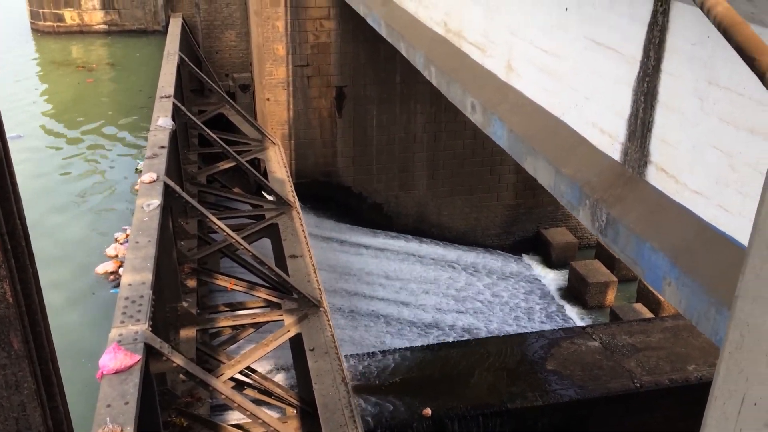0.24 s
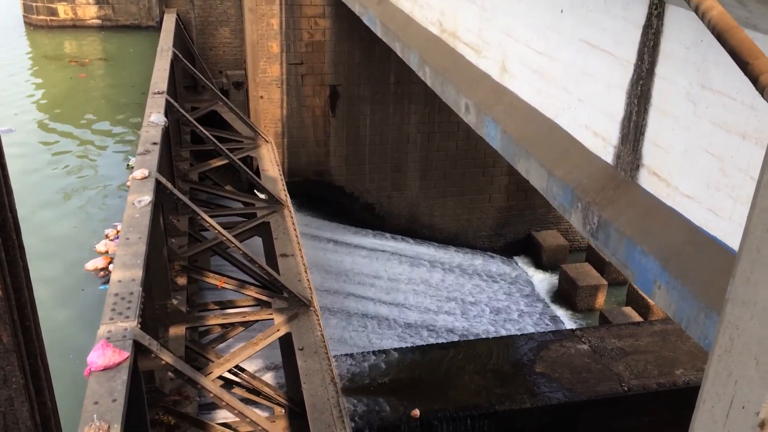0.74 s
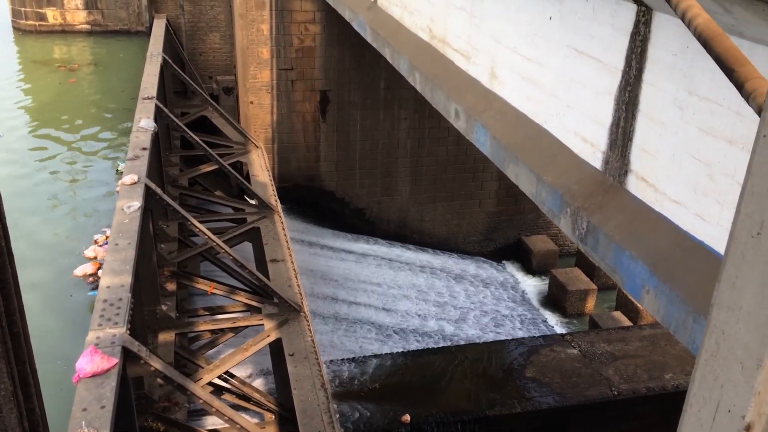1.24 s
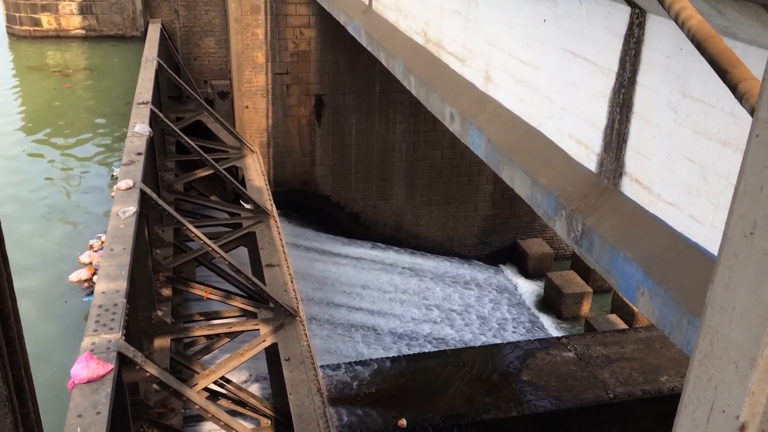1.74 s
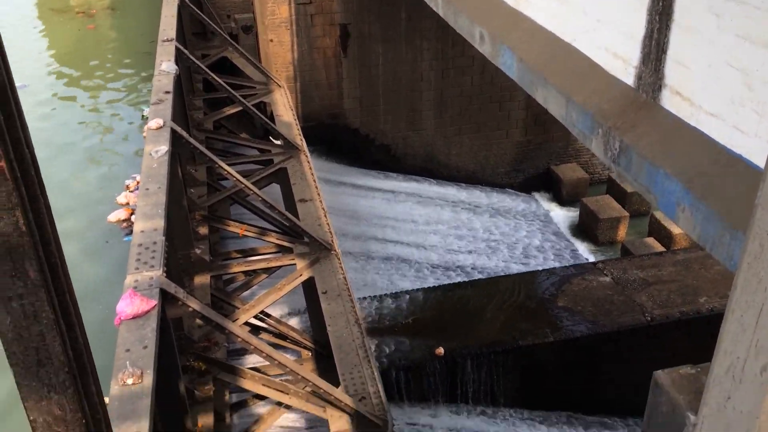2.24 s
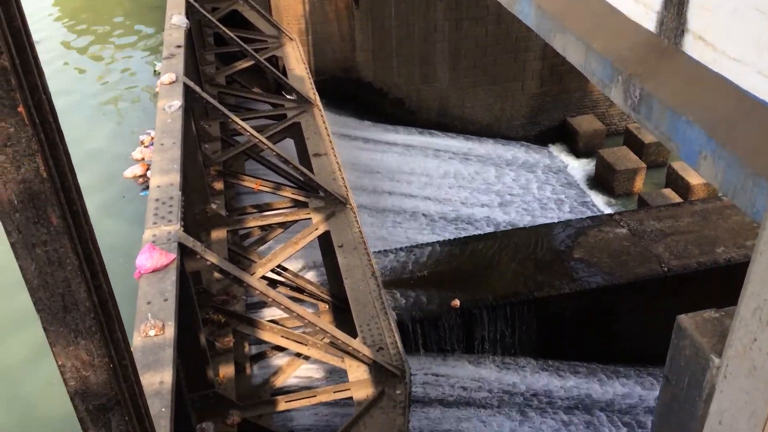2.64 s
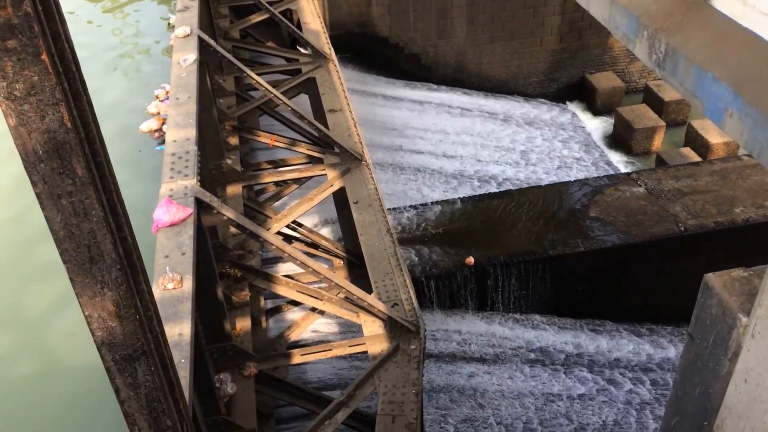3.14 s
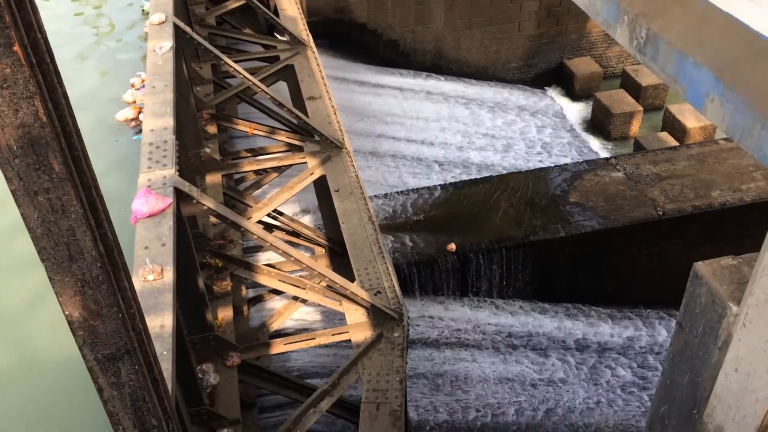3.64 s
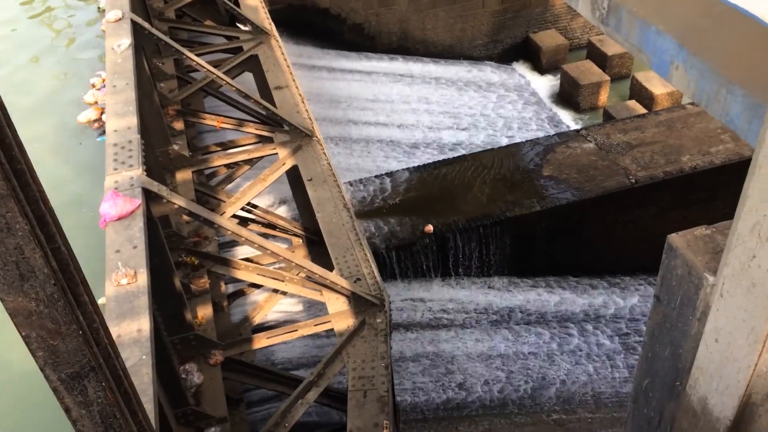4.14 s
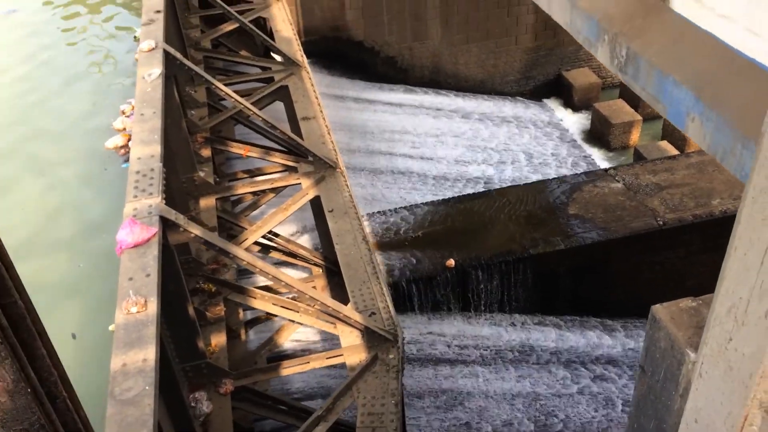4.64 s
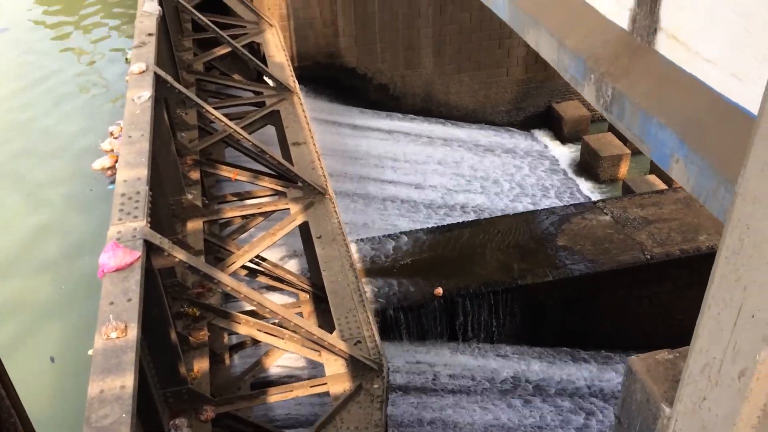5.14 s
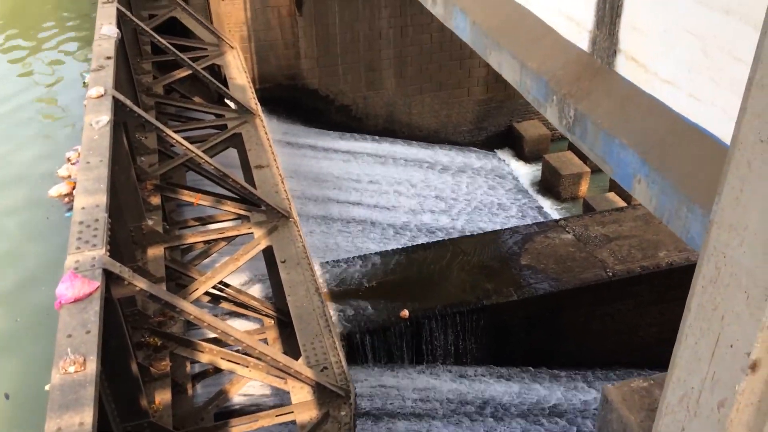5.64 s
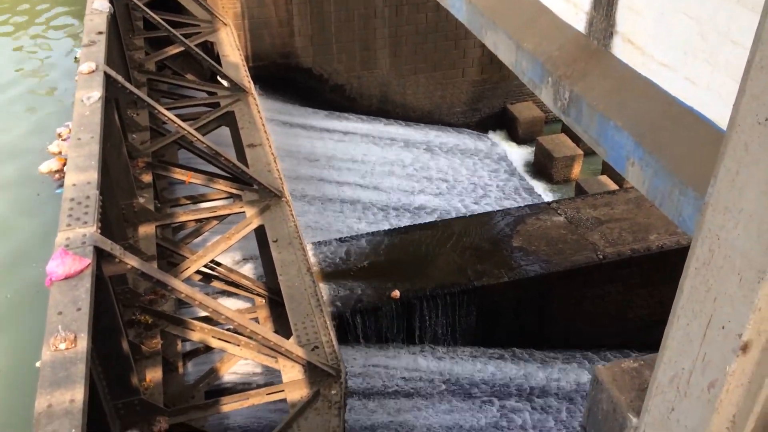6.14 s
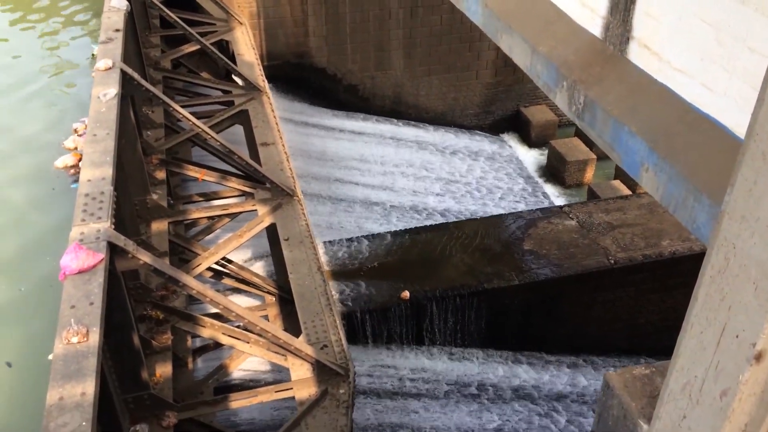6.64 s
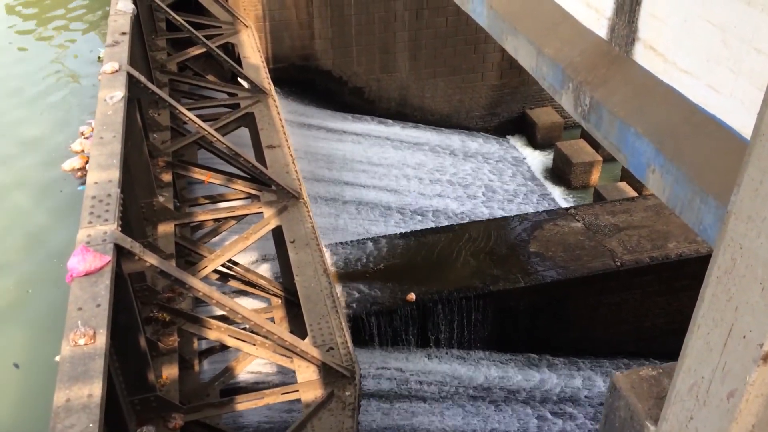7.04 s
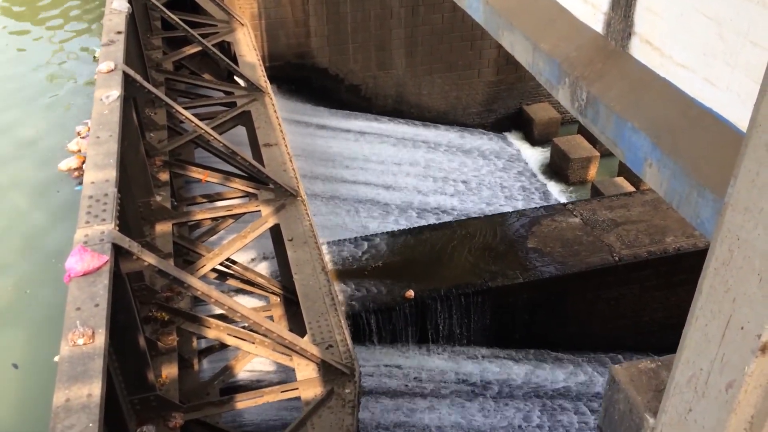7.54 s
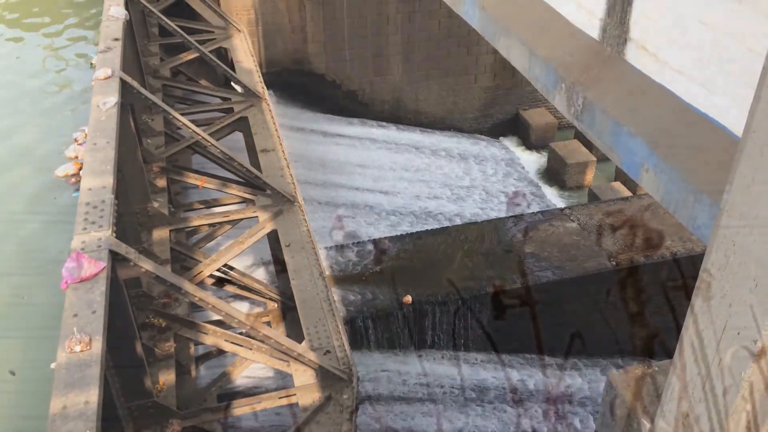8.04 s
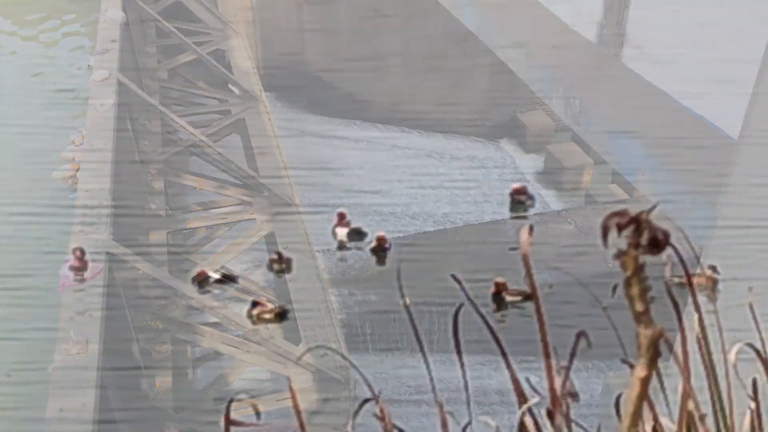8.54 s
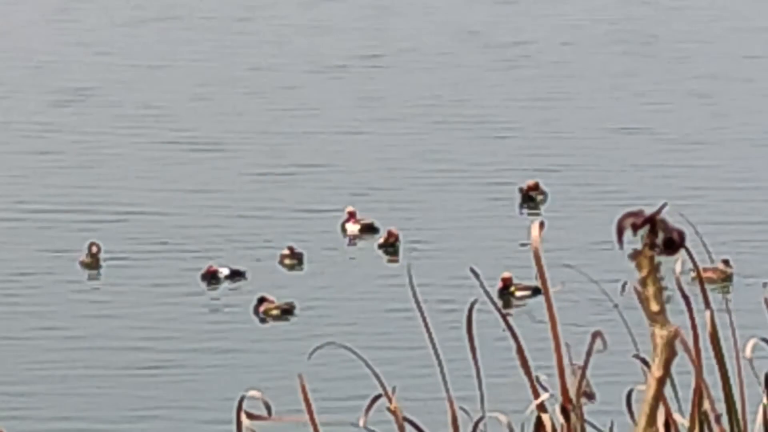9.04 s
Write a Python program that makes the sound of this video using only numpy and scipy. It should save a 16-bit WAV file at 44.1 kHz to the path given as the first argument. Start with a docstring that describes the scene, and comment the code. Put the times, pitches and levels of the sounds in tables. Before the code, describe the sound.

A dense, steady rush of river water shoots down a concrete spillway, heard from a walkway above: bubbly foam, bright spray hiss, deep rumble and irregular heavy thumps with small splashes. After about eight seconds it stops dead. A brief silence follows, then a much quieter open lakeside with light wind low on the microphone, far hum, thin insects, one tick and faint bird whistles. Mono.

```python
"""A dense rush of bubbles and spray over the deep rumble of water pounding a stilling basin, heard in mono:
river water shoots under sluice gates and down a concrete spillway, below the listener on a walkway.
Foam and spray are patchy noise, near bubbles ringing clicks, thumps and the concrete bay damped resonances.
It stops dead; after a short silence comes a quiet lakeside: light wind and hush from noise, a far hum
from a tone and blurred bands, insects from narrow noise, one tick and a small bird of whistled glides."""
import sys
import numpy as np
from scipy import signal
from scipy.io import wavfile
from scipy.ndimage import uniform_filter1d

SR = 44100
rng = np.random.default_rng(int(sys.argv[2]) if len(sys.argv) > 2 else 0)


def wrap_up_sound(samples):
    """Save the sound to the file named by the first command line argument, as 16-bit audio."""
    columns = np.atleast_2d(samples).T
    # keep every value between -1 and 1, then stretch to whole-number steps
    tamed = np.clip(columns, -1, 1)
    steps = np.round(tamed * 32767).astype(np.int16)
    wavfile.write(sys.argv[1], SR, steps)


N = 410130
TIME = np.arange(N) / SR
RUSH_END_S, LAKE_START_S, LAKE_FADE_S = 8.326, 8.602, .004

# Spectrum of the foam, shared by blur and bubbles. Each row: frequency in Hz, relative level in dB per Hz.
FOAM_SPECTRUM = [(330, -0.5), (450, -8), (650, -1.5), (1000, -0.5), (1600, 0.5), (2200, -0.5), (3000, -2.5),
                 (4200, -6), (5500, -9), (9000, -26)]


def from_db(db):
    """Decibels to gain."""
    return 10 ** (np.asarray(db) / 20)


def rms_one(x):
    """Scale to rms 1."""
    return x / np.sqrt(np.mean(x ** 2) + 1e-20)


def evened(x, window_s):
    """Hold the running rms near 1, leaving only the faster flutter."""
    size = max(int(window_s * SR), 2)
    power = uniform_filter1d(uniform_filter1d(x ** 2, size), size)
    return x / np.sqrt(power + 1e-12)


def in_time(rows):
    """Draw each column of a curve sample by sample; the first column is time in seconds."""
    s, *columns = np.transpose(rows)
    return [np.interp(TIME, s, column) for column in columns]


def at_hz(points, hz):
    """Read a spectrum on a log-frequency axis."""
    point_hz, point_db = np.array(points).T
    return np.interp(np.log(hz), np.log(point_hz), point_db)


def drift(rate_hz):
    """Slow random wandering of rms 1: noise through two equal low-pass poles at the given rate."""
    step = 100   # samples between the points of the slow curve
    r = np.exp(-2 * np.pi * rate_hz * step / SR)
    noise = rng.standard_normal(N // step + 1002)
    slow = signal.lfilter([1], [1, -2 * r, r * r], noise)[1000:]   # skip the filter's start
    return np.interp(np.arange(N) / step, np.arange(len(slow)), rms_one(slow))


def swell(s, width_s):
    """A bell-shaped envelope around time s."""
    return np.exp(-((TIME - s) / width_s) ** 2 / 2)


def band(x, low_hz, high_hz):
    """Butterworth band-pass."""
    edges = [low_hz, min(high_hz, .48 * SR)]
    return signal.sosfilt(signal.butter(2, edges, "band", fs=SR, output="sos"), x)


def resonate(x, hz, width_hz):
    """A damped two-pole resonance with gain 1 at its top; the wider it is, the sooner it dies."""
    r = np.exp(-np.pi * width_hz / SR)
    zeros = np.array([1, 0, -1]) * (1 - r * r) / 2
    poles = [1, -2 * r * np.cos(2 * np.pi * hz / SR), r * r]
    return signal.lfilter(zeros, poles, x + 1e-18)


def narrow_noise(hz, width_hz):
    """Noise twice through one resonance; rms 1."""
    once = resonate(rng.standard_normal(N), hz, width_hz)
    return rms_one(resonate(once, hz, width_hz))


def turbulence(spectrum, patchy_db, patch_rate_hz, count):
    """Bands of noise that each swell and sink on their own; rms 1."""
    edges = np.geomspace(spectrum[0][0], spectrum[-1][0], count + 1)
    white, out = rng.standard_normal((2, N)), 0   # neighbouring bands get unrelated noise
    for k, (low, high) in enumerate(zip(edges, edges[1:])):
        level_db = at_hz(spectrum, np.sqrt(low * high)) + patchy_db * drift(patch_rate_hz)
        out = out + from_db(level_db) * band(white[k % 2], low, high)
    return rms_one(out)


def bubbles(per_s, size_spread_db, sharpness, clump_db, clump_rate_hz, count):
    """Bubbles pinch off in loose clumps of like size; each rings for a few cycles at the pitch of its size."""
    strength = from_db(size_spread_db * np.minimum(rng.exponential(1, N), 4))
    strength = strength * rng.choice([-1, 1], N)
    clicks = strength * (rng.random(N) < per_s / SR)
    dealt, out = rng.integers(0, count, N), 0   # which pitch each click excites
    for k, hz in enumerate(np.geomspace(480, 5500, count)):
        if k % 3 == 0:   # three neighbouring sizes clump together
            clump = from_db(clump_db * drift(clump_rate_hz))
        ringing = resonate(clump * clicks * (dealt == k), hz, hz / sharpness)
        out = out + from_db(at_hz(FOAM_SPECTRUM, hz)) * ringing
    return rms_one(out)


def white_water():
    """Near bubbles stand on the blur of countless far ones; spray hisses above, and both surge together."""
    # White water, slowly turning brighter. Each row: time in seconds, foam and spray level in dB before trim.
    flow = [(0.0, -31.5, -34.0), (0.6, -32, -34.0), (2.5, -32.5, -34.4), (3.4, -32.5, -33.5),
            (4.6, -32, -33), (6.3, -32, -32.5), (8.3, -31.9, -33.0)]
    # Spectrum of the spray. Each row: frequency in Hz, relative level in dB per Hz.
    spray_spectrum = [(2000, -22), (3800, -1), (5400, -2.5), (6500, -0.5), (8500, -2), (10200, -2.5),
                      (12000, -4.5), (14000, -6), (16000, -13.5)]
    foam_db, spray_db = in_time(flow)
    surge = drift(7)
    blur = turbulence(FOAM_SPECTRUM, patchy_db=0.5, patch_rate_hz=16, count=13)
    near = bubbles(per_s=11000, size_spread_db=4, sharpness=10, clump_db=1.64, clump_rate_hz=16, count=30)
    foam_trim_db, spray_trim_db, near_db = 0.45, -0.04, -4.5   # near bubbles against the blur
    foam = from_db(foam_db + foam_trim_db + 0.15 * surge) * rms_one(blur + from_db(near_db) * near)
    hiss = turbulence(spray_spectrum, patchy_db=0.5, patch_rate_hz=9.6, count=16)
    return foam + from_db(spray_db + spray_trim_db + 0.1 * surge) * hiss


def basin():
    """The sheet of water pounds the baffle blocks and sets the air of the concrete bay ringing."""
    # Pounding in the basin. Each row: time in seconds, level in dB about which it heaves.
    pounding = [(0, -41.5), (.4, -37.5), (1.8, -38), (2.35, -37), (2.8, -37), (3.5, -38), (4.2, -39.5),
                (5.5, -39), (6.3, -39), (6.9, -38.5), (7.35, -41.5), (7.95, -37.5), (8.3, -39.5)]
    # Wash between the piers. Each row: time in seconds, level in dB before trim.
    wash = [(0.0, -39.5), (1.1, -39.5), (2.0, -42.5), (3.6, -43.5), (5.1, -42.5), (7.0, -42), (8.3, -41)]
    # Spectrum of the basin rumble. Each row: frequency in Hz, relative level in dB per Hz.
    rumble_spectrum = [(22, -23), (32, -13.5), (45, -6.5), (62, 1), (88, -3), (113, 1.5), (142, 0.5),
                       (175, -9), (215, -13), (270, -33.5)]
    # Broad resonances of the concrete bay. Each row: frequency in Hz, width in Hz, relative level in dB.
    bay_modes = [(175, 30, 6), (303, 59, 2.5), (584, 256, -4.5)]
    heave_db, heave_rate_hz, wash_trim_db = 1.6, 10, 0.64
    pounding_db, = in_time(pounding)
    wash_db, = in_time(wash)
    heaving = from_db(pounding_db + heave_db * drift(heave_rate_hz))
    rumble = evened(turbulence(rumble_spectrum, patchy_db=1.4, patch_rate_hz=4.7, count=11), window_s=0.089)
    churn = band(rng.standard_normal(N), 130, 785) * from_db(0.4 * drift(11))
    bay = np.zeros(N)
    for k, (hz, width_hz, db) in enumerate(bay_modes):
        bay += (-1) ** k * from_db(db) * resonate(churn, hz, width_hz)   # neighbours in opposite sign
    return heaving * rumble + from_db(wash_db + wash_trim_db) * evened(bay, window_s=0.08)


def splashes():
    """Now and then a wave slaps against the blocks and releases a loose cloud of bubbles: a burst of noise."""
    # Larger splashes. Each row: centre in seconds, width in seconds, lowest and highest Hz, level in dB.
    slaps = [(.035, 0.015, 800, 1700, -37.5), (.108, 0.02, 830, 1350, -34), (.255, .014, 480, 1050, -37),
             (1.82, .01, 2300, 3100, -39), (2.69, .015, 1650, 2200, -37), (4.1, .01, 1450, 1900, -39),
             (5.37, .012, 2400, 3200, -38.5), (7.47, .012, 1450, 2000, -37), (7.55, .035, 1300, 2200, -37),
             (7.86, .012, 1450, 2000, -36), (8.27, .012, 2300, 3000, -41)]
    out = np.zeros(N)
    for s, width_s, low_hz, high_hz, db in slaps:
        cloud = rms_one(band(rng.standard_normal(N), low_hz, high_hz))
        out += from_db(db) * swell(s, width_s) * cloud
    return out


def thumps():
    """Each slug traps a pocket of air that gives one or two deep, heavily damped swings, amid boiling water."""
    # Heavy slugs of water hitting the baffle blocks. Each row: start in seconds, pitch in Hz, peak in dB.
    slugs = [(.398, 126, -33), (.46, 115, -29.5), (0.916, 70, -35), (1.173, 97, -28.5), (1.353, 179, -32.5),
             (1.457, 168, -28.5), (1.505, 122, -25), (1.613, 111, -30), (2.022, 86, -24.5),
             (2.157, 88, -24), (2.294, 111, -23), (2.326, 130, -25.5), (2.44, 97, -26), (2.486, 145, -32),
             (2.625, 98, -27), (2.676, 120, -30), (2.761, 91, -22.5), (2.796, 89, -24), (2.838, 92, -27.5),
             (2.98, 70, -27.5), (3.058, 138, -29.5), (3.236, 87, -27.5), (3.402, 150, -28),
             (3.911, 82, -30), (4.416, 127, -31), (4.452, 95, -29.5), (4.472, 169, -30), (4.9, 94, -27.5),
             (5.004, 102, -24.5), (5.131, 80, -32), (5.644, 92, -26), (6.018, 129, -29.5),
             (6.176, 104, -29), (6.395, 121, -28), (6.417, 179, -29.5), (6.832, 114, -28.5),
             (7.092, 162, -28), (7.181, 124, -28.5), (7.656, 60, -30.5), (7.904, 120, -30),
             (7.959, 110, -26.5), (8.041, 176, -28), (8.279, 117, -27.5)]
    pocket_width_hz = 63   # wide enough to die within a cycle or two
    boil_db, boil_width_s = -18.5, .02   # boiling against the thump's peak
    out, boiling = np.zeros(N), np.zeros(N)
    for s, hz, db in slugs:
        blow = signal.unit_impulse(N, int(s * SR))
        pocket = resonate(resonate(blow, hz, pocket_width_hz), hz, pocket_width_hz)
        out += from_db(db) * pocket / np.abs(pocket).max()
        boiling += from_db(db + boil_db) * swell(s, boil_width_s)
    return out + boiling * evened(band(rng.standard_normal(N), 68, 150), window_s=.06)


def machinery_hum():
    """Far machinery hums across the lake: one slightly wavering tone and blurred bands of noise."""
    # Blurred bands of the hum. Each row: frequency in Hz, width in Hz, level in dB.
    hum_bands = [(975, 90, -69.5), (1440, 70, -75)]
    tone_hz = 708 + 2.5 * drift(8)
    hum = from_db(-65.5) * rms_one(np.sin(2 * np.pi * np.cumsum(tone_hz) / SR))
    for hz, width_hz, db in hum_bands:
        hum += from_db(db) * evened(narrow_noise(hz, width_hz), window_s=.08)
    return hum


def insects(near_db):
    """A thin, trembling near insect over a broader, steady far chorus, both narrow noise."""
    near = from_db(near_db + 1.3 * drift(50)) * narrow_noise(8200, width_hz=710)
    return near + from_db(-66.5) * narrow_noise(8020, width_hz=1400)


def reed_tick():
    """A light tick in the reeds: a very short swell of high noise."""
    return from_db(-60) * swell(9.011, width_s=.007) * rms_one(band(rng.standard_normal(N), 4500, 12000))


def lakeside():
    """Light wind on the microphone and distant hush as turbulent noise, with hum, insects, a tick and a bird."""
    # Lakeside levels. Each row: time in seconds, wind, hush and near insect level in dB.
    lake_levels = [(8.6, -41, -56.5, -66), (8.87, -38.5, -56.5, -65), (9.02, -44, -54.5, -73),
                   (9.3, -45, -56, -77)]
    # Spectra of the wind and the hush. Each row: frequency in Hz, relative level in dB per Hz.
    wind_spectrum = [(10, 8), (25, 8), (48, -3), (70, -4), (100, -18)]
    hush_spectrum = [(90, -11), (160, -3), (280, -8), (370, -4), (480, -13), (620, -15), (830, -17),
                     (1000, -17), (1280, -24), (2200, -19), (3300, -22), (5200, -37), (15000, -45)]
    wind_db, hush_db, insect_db = in_time(lake_levels)
    gusts = turbulence(wind_spectrum, patchy_db=4.5, patch_rate_hz=5.8, count=5)
    wind = from_db(wind_db) * evened(gusts, window_s=0.16)
    hush = from_db(hush_db) * turbulence(hush_spectrum, patchy_db=0.4, patch_rate_hz=8.9, count=24)
    return wind + hush + machinery_hum() + insects(insect_db) + reed_tick() + bird()


def bird():
    """Short, faint whistles, most of them gliding, with a ragged flutter, smeared by scattering off the bank."""
    # Bird notes. Each row: start in seconds, length in seconds, first and last Hz, level in dB before flutter.
    notes = [(8.9, .04, 2120, 2120, -68.5), (8.955, .06, 3170, 3270, -67.5), (8.993, .04, 2850, 3100, -67),
             (8.99, .085, 3220, 4280, -68.5), (9.015, .04, 2150, 2090, -68), (9.045, .045, 4050, 4720, -69),
             (9.099, .032, 3800, 3640, -61), (9.11, .035, 2370, 2310, -69)]
    whistles = np.zeros(N)
    waver, flutter = 1 + .008 * drift(111), from_db(2 * drift(120))
    for start, length, first_hz, last_hz, db in notes:
        along = np.linspace(0, 1, int(length * SR))
        note = int(start * SR) + np.arange(len(along))
        pitch_hz = (first_hz + (last_hz - first_hz) * along) * waver[note]
        tone = np.sin(2 * np.pi * np.cumsum(pitch_hz) / SR)
        whistles[note] += from_db(db) * flutter[note] * np.sin(np.pi * along) * tone
    lag = TIME[:SR // 2]
    scatter = rng.standard_normal(len(lag)) * from_db(-60 * lag / .11)   # falls 60 dB in 0.11 s
    smear = signal.fftconvolve(whistles, scatter / np.linalg.norm(scatter))[:N]
    return whistles + from_db(1) * smear


def scene():
    """The spillway, a short silence, the lakeside; both channels alike."""
    spillway = white_water() + splashes() + basin() + thumps()
    lake_gain = np.clip((TIME - LAKE_START_S) / LAKE_FADE_S, 0, 1)
    mono = spillway * (TIME < RUSH_END_S) + lakeside() * lake_gain
    return np.array([mono, mono])


def record(dry):
    """Cut the top steeply above 15750 Hz with an elliptic low-pass."""
    return signal.sosfilt(signal.ellip(12, .1, 80, 15750, fs=SR, output="sos"), dry)


dry = scene()
out = record(dry)
wrap_up_sound(out)
```